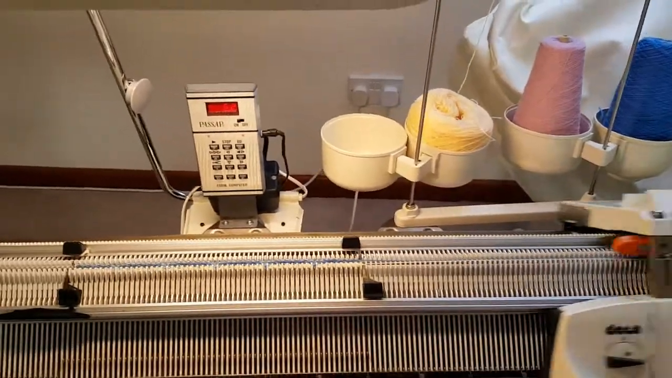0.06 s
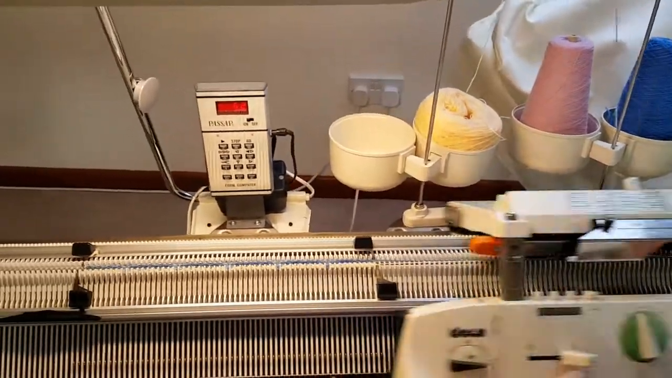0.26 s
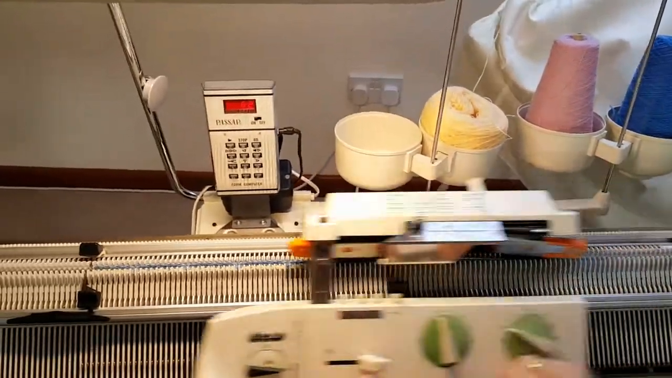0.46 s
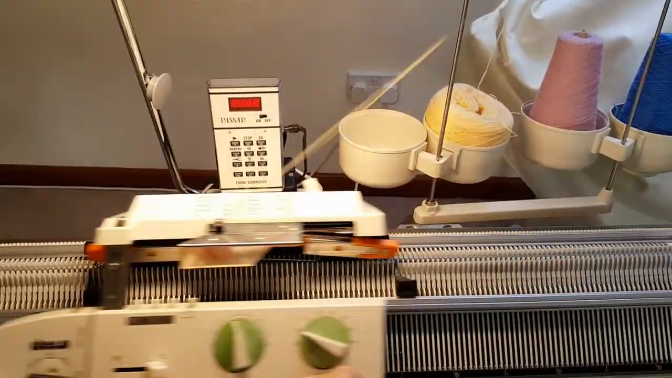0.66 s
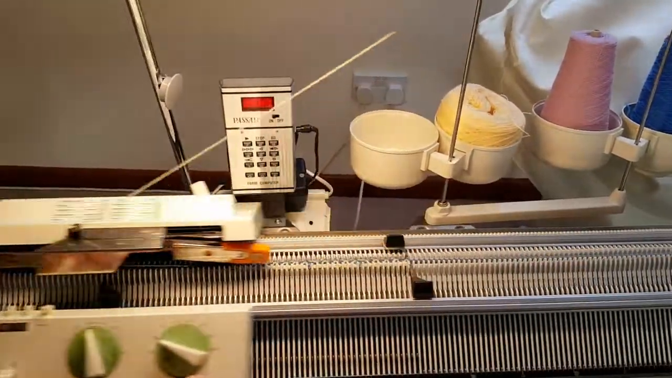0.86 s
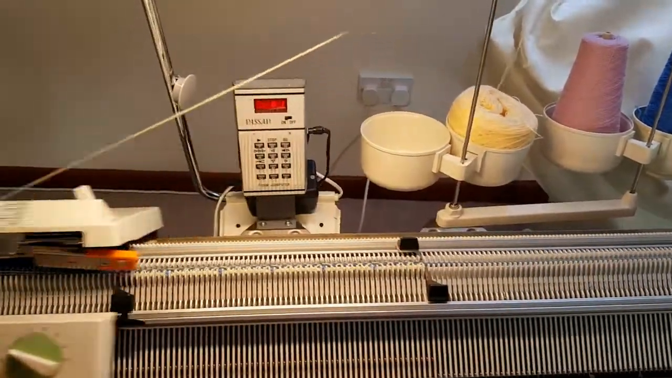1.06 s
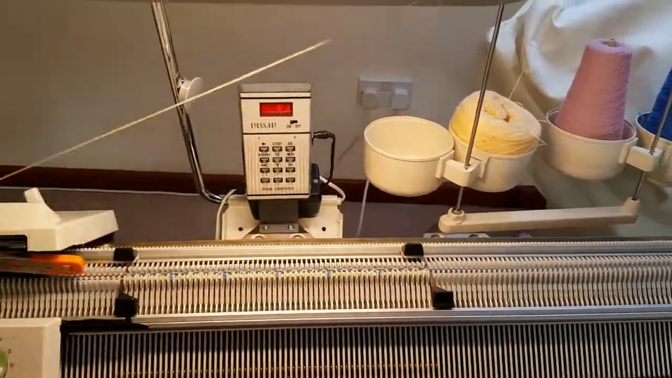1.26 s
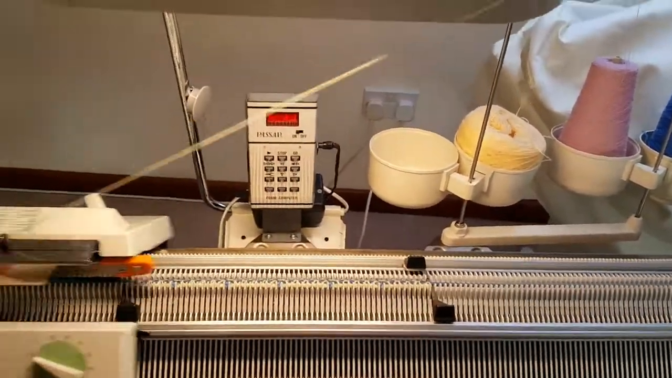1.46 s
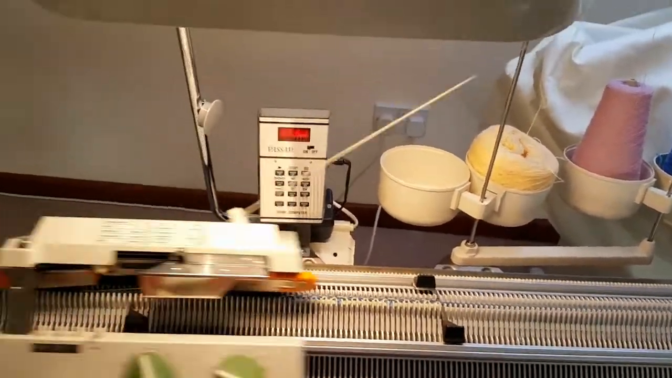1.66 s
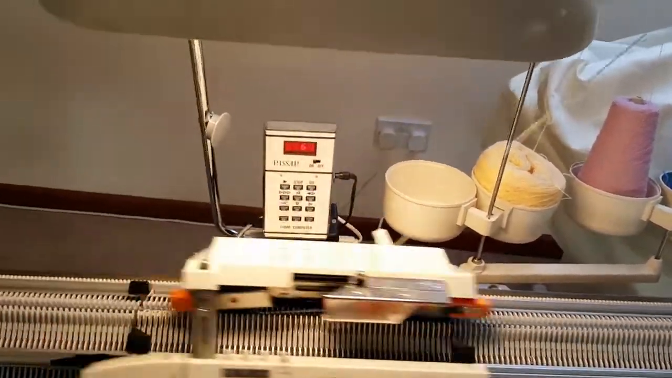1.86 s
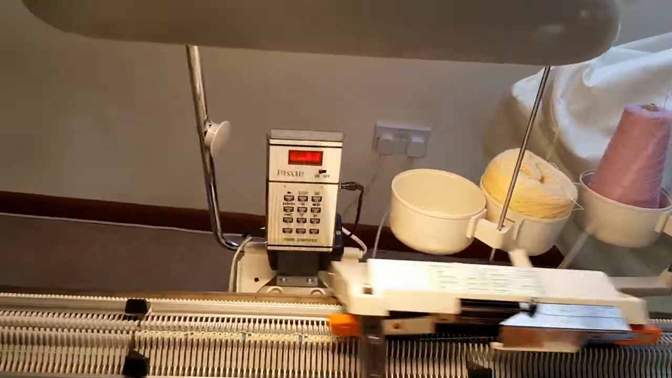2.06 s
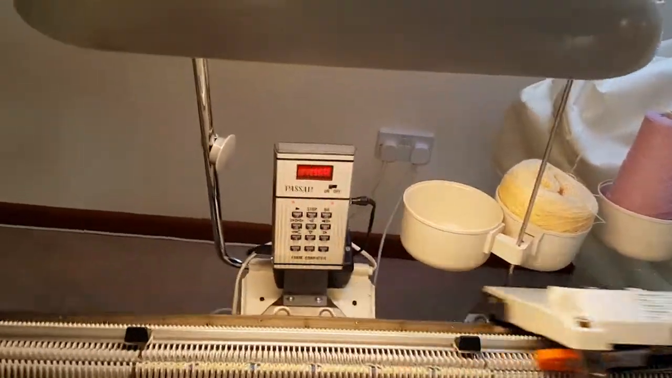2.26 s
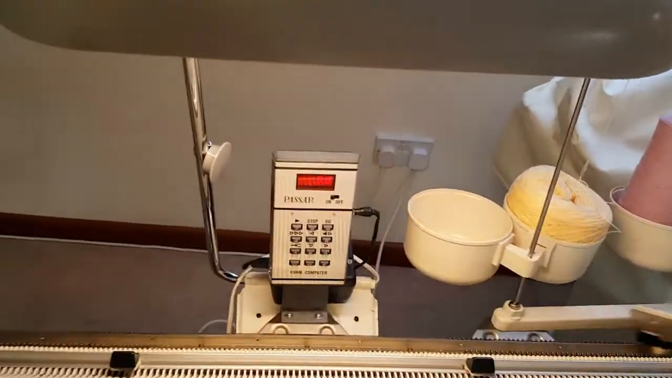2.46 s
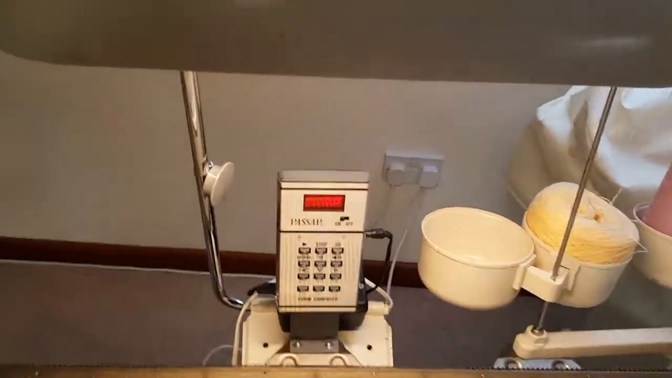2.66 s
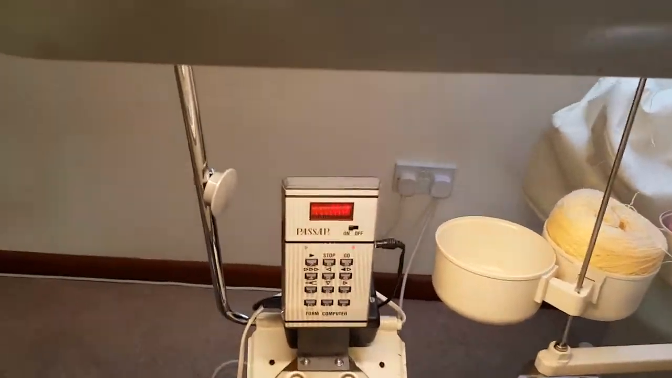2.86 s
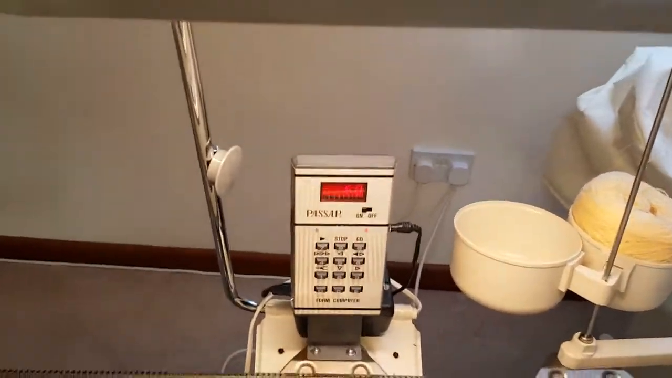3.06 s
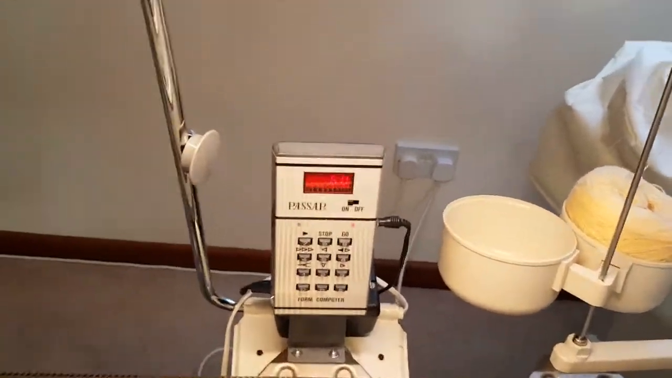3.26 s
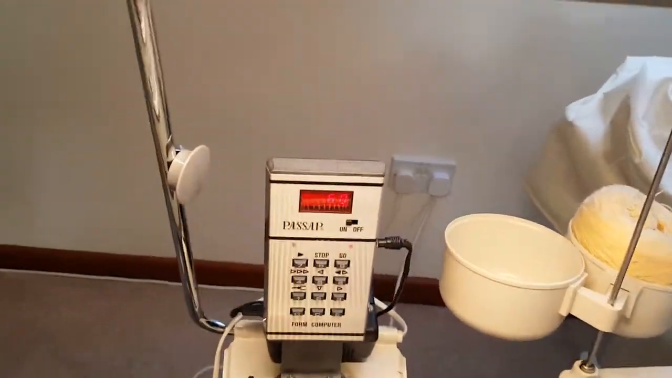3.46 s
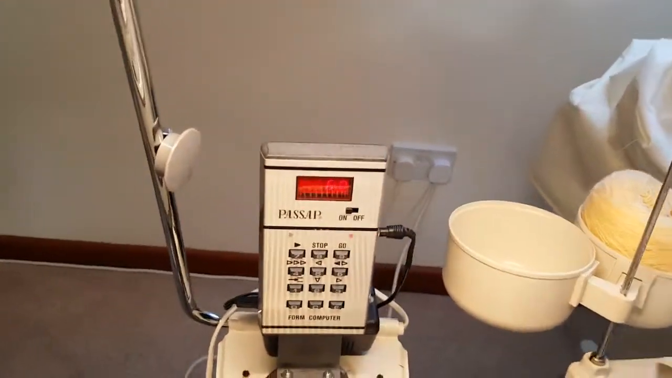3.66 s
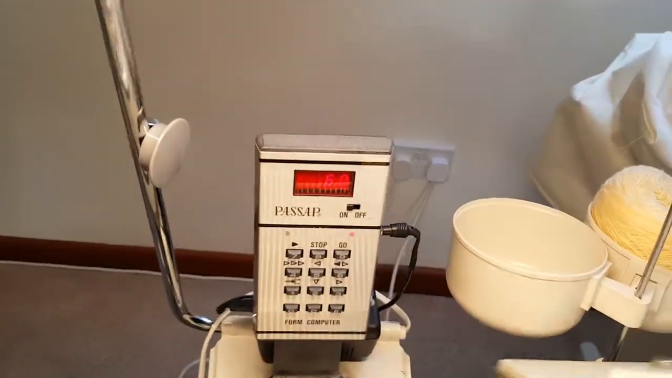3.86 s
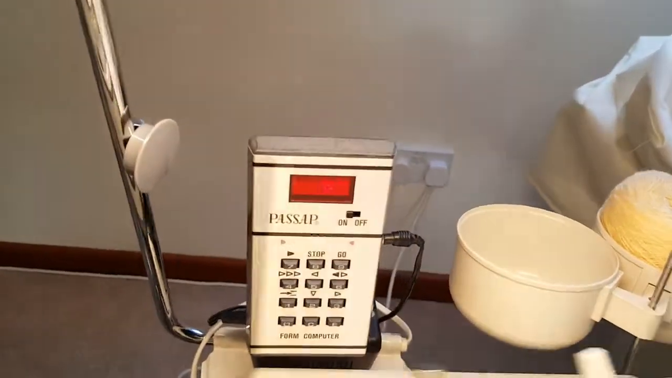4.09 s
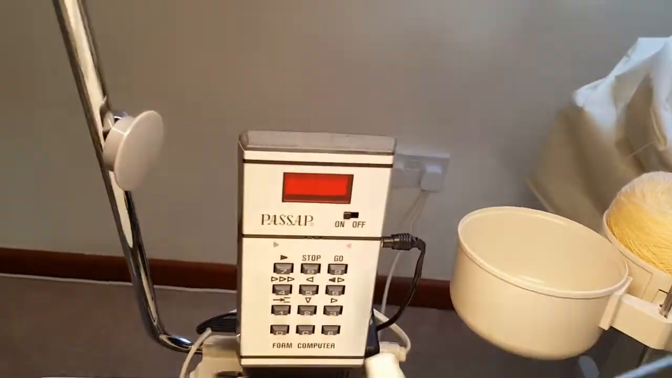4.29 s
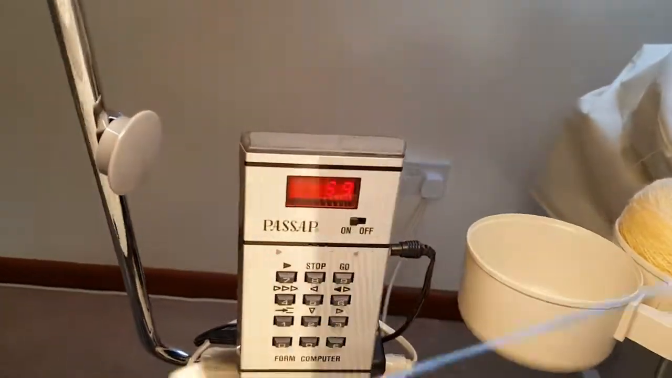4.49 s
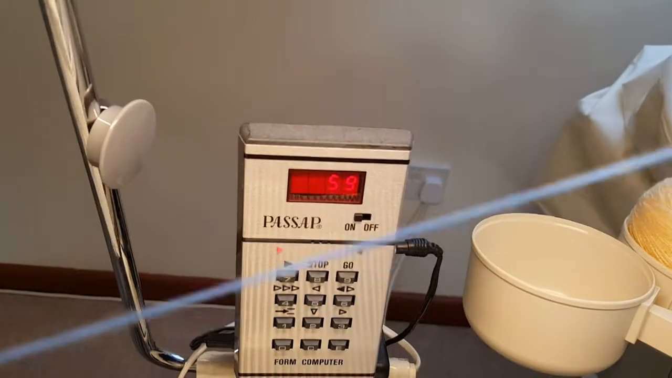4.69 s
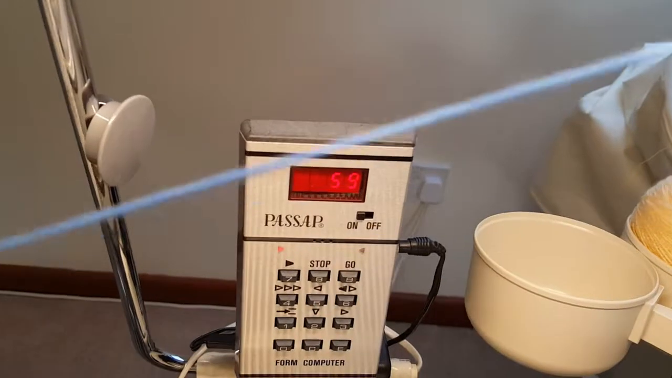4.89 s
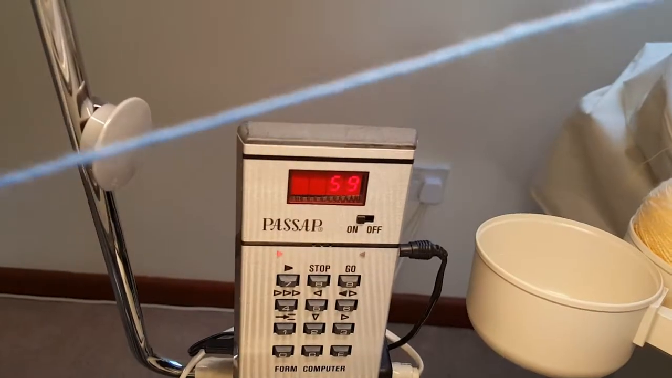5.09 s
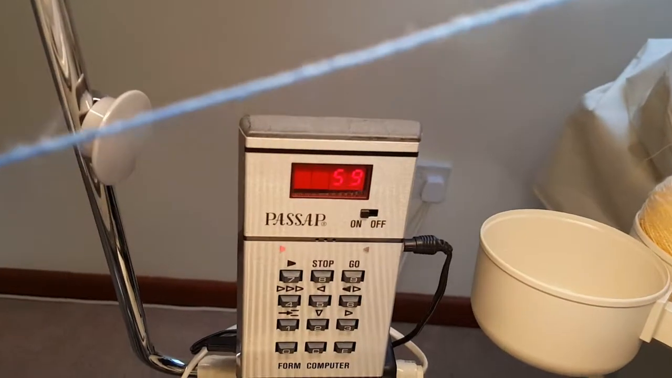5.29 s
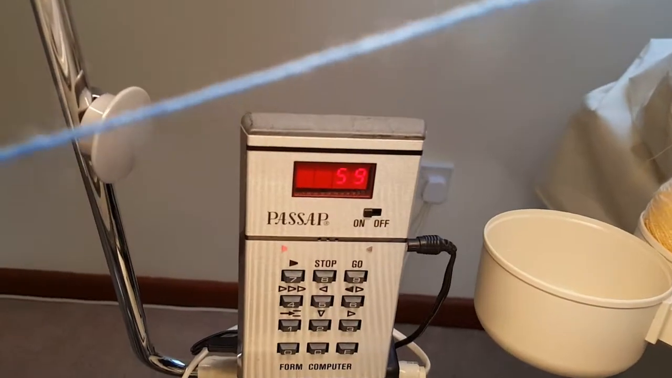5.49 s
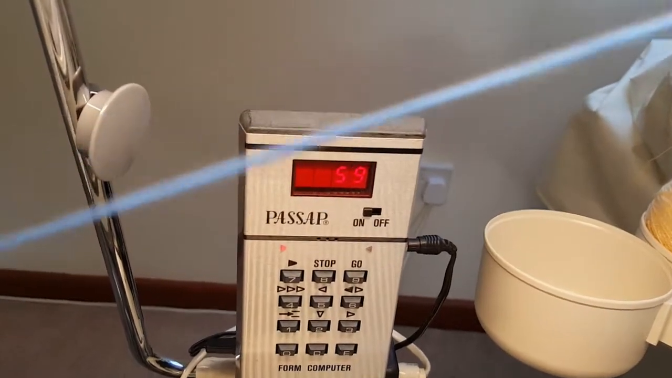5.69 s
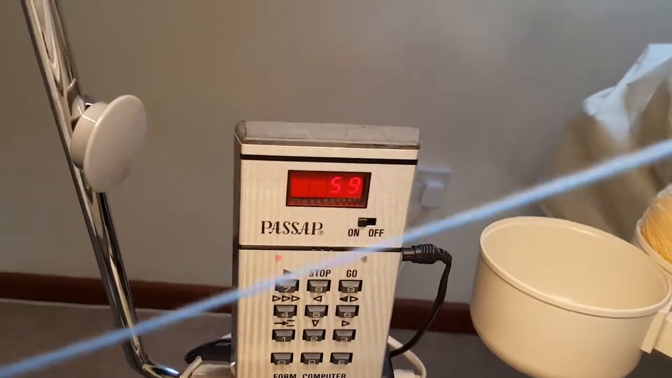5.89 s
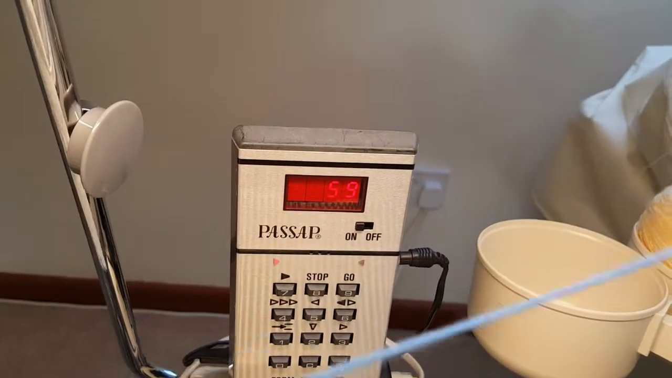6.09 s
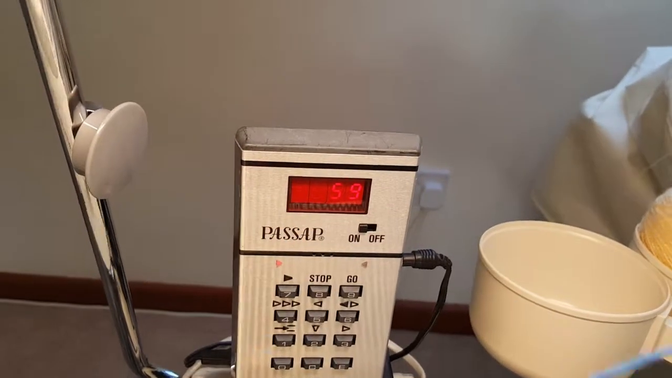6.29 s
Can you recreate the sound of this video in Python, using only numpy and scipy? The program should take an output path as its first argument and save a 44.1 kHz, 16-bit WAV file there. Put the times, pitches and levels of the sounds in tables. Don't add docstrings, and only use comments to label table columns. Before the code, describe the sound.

A few clicks and jerky shoves start the carriage, then a fast metallic rattle runs over the needles and dies away. After a tiny gap a second pass swells and stops with a knock. Bright snaps and plastic clacks fill the turn, a third rattling pass follows, and light ticks remain over faint room air, heard close with slight handling rumble.

```python
import sys
import numpy as np
from scipy import signal
from scipy.fft import rfft, irfft, next_fast_len
from scipy.io import wavfile
from scipy.ndimage import uniform_filter1d

SR = 44100
rng = np.random.default_rng(int(sys.argv[2]) if len(sys.argv) > 2 else 0)


def wrap_up_sound(samples):
    columns = np.atleast_2d(samples).T
    tamed = np.clip(columns, -1, 1)
    steps = np.round(tamed * 32767).astype(np.int16)
    wavfile.write(sys.argv[1], SR, steps)


def ratio_of_db(decibels):
    return 10 ** (np.asarray(decibels, float) / 20)


N = 279594


def evened(x):
    return x / np.sqrt(np.mean(x ** 2) + 1e-20)


def steady(x, span_s=0.12):
    return x / np.sqrt(uniform_filter1d(x ** 2, int(span_s * SR)) + 1e-12)


def read(points, hz):
    f, value = np.transpose(points)
    return np.interp(np.log(hz + 1), np.log(f + 1), value)


def over_time(points):
    return np.interp(np.arange(N) / SR, *np.transpose(points))


def add(mix, s, sound):
    part = mix[round(s * SR):][:len(sound)]
    part += sound[:len(part)]


def body(points, rings=(), tilt_db=0, knee_hz=1500, size=4096):
    hz = np.fft.rfftfreq(size, 1 / SR)
    gain = ratio_of_db(read(points, hz) + tilt_db * np.log2(np.maximum(hz, knee_hz) / 6000))
    gain = gain * (1 + sum(ratio_of_db(db) * 2 / np.hypot(1, 2 * (hz - f) / w) for f, w, db in rings))
    cepstrum = irfft(np.log(gain / gain.max() + 1e-5))
    cepstrum[1:size // 2] *= 2
    cepstrum[size // 2 + 1:] = 0
    taps = irfft(np.exp(rfft(cepstrum)))
    return taps / np.linalg.norm(taps)


def ring(x, taps):
    return signal.oaconvolve(x, taps)[:len(x)]


def hum(x, hz, width_hz):
    r = np.exp(-np.pi * width_hz / SR)
    return signal.lfilter([1], [1, -2 * r * np.cos(2 * np.pi * hz / SR), r * r], x)


def wander(x, patchy_db):
    z = signal.stft(x, SR, nperseg=512, noverlap=384)[2]
    field = rng.standard_normal(z.shape)
    field = uniform_filter1d(uniform_filter1d(field, size=9, axis=0), size=12, axis=1)
    return signal.istft(z * ratio_of_db(patchy_db * evened(field)), SR, nperseg=512, noverlap=384)[1][:N]


# time_s, effort_db
PASSES = [
    [(.4, -41.5), (.446, -20.5), (.72, -19), (.92, -21.5), (.945, -25), (1.2, -28.5), (1.25, -31.5),
     (1.3, -39), (1.445, -55.5)],
    [(1.64, -35.5), (1.72, -28), (1.85, -21.5), (2.05, -18), (2.2, -20), (2.3, -18.5), (2.38, -19),
     (2.43, -32.5)],
    [(3.99, -31.5), (4.03, -25.5), (4.2, -20), (4.33, -18.5), (4.45, -22), (4.6, -27), (4.8, -27.5),
     (4.92, -35.5), (5.0, -44.5)],
]
BITE_DB = [0.5, 5, 0.5]
# pass_share, lead_db
NEEDLE_LEAD = [(0, -3.5), (.15, 2), (0.349, 0), (.65, -3), (1, -3.5)]
# start_s, hold_s, effort_db, lead_db
SHOVES = [(0.0, 0.09, -29, -0.5), (0.119, 0.046, -33, 3.5), (0.165, 0.097, -31, 8),
          (0.256, 0.064, -27, 2.5), (0.356, 0.038, -39, 5.5), (1.458, 0.077, -57.5, 5),
          (1.512, 0.019, -46, 3), (1.548, 0.055, -41.5, 11), (2.45, 0.068, -27, -2), (2.576, 0.043, -35, 2),
          (2.641, 0.039, -36, 4), (2.704, 0.28, -42.5, 6), (2.874, 0.082, -33, -2.5),
          (2.992, 0.019, -38, 5), (3.016, .1, -30, -1), (3.1, .05, -35, -8.5), (3.175, 0.13, -51, -3),
          (3.315, 0.084, -37.5, 3), (3.42, 0.12, -29, 0.5), (3.578, 0.097, -31.5, 11.5),
          (3.678, 0.1, -31, 0), (3.795, 0.16, -38, 6.5), (4.972, 0.12, -47.5, 2), (5.114, .16, -52.5, 3.5),
          (5.302, 0.5, -62.5, 4), (5.56, .09, -56, 0), (5.698, 0.12, -51, -5), (5.791, 0.13, -49.5, 8),
          (5.928, 0.16, -47, -4.5), (6.074, .05, -52.5, 8), (6.15, 0.053, -43, 2), (6.231, 0.21, -34.5, 3)]
RISE_DB_PER_S, FALL_DB_PER_S = 800.5, 318.5


def motion():
    t, parts = np.arange(0, N + 32, 32) / SR, []

    def edge_db(start, end):
        return RISE_DB_PER_S * np.maximum(start - t, 0) + FALL_DB_PER_S * np.maximum(t - end, 0)

    for (s, db), bite_db in zip(map(np.transpose, PASSES), BITE_DB):
        share = np.clip((t - s[0]) / (s[-1] - s[0]), 0, 1)
        lead_db = np.interp(share, *np.transpose(NEEDLE_LEAD)) + bite_db * (1 - share)
        parts.append((np.interp(t, s, db) - edge_db(s[0], s[-1]), lead_db))
    for s, hold, db, lead_db in SHOVES:
        parts.append((db - edge_db(s, s + hold), lead_db))
    power = sum(ratio_of_db(2 * db) for db, _ in parts) + 1e-9
    lead_db = sum(ratio_of_db(2 * db) * lead for db, lead in parts) / power
    return [np.interp(np.arange(N) / SR, t, db) for db in (10 * np.log10(power), lead_db)]


def needle_train(speed, per_s, spread_db, bunch):
    unevenness = 1 + 1.5 * uniform_filter1d(rng.standard_normal(N), size=900)
    turns = np.cumsum(speed * unevenness) / SR
    chance = per_s / SR * (1 + bunch * np.exp(-(turns % 1) / .15))
    size = ratio_of_db(spread_db * np.minimum(rng.exponential(1, N), 4)) * rng.standard_normal(N)
    return size * (rng.random(N) < chance)


# pitch_hz, level_db per Hz
STEEL = [(880, -83.5), (1500, -7), (2290, -7.5), (3000, -7.5), (3810, -6), (4760, -4), (5640, -6),
         (7770, -6), (10600, -10.5), (12600, -9.5), (15500, -10.5), (16000, -43), (16500, -55.5)]
# pitch_hz, width_hz, level_db
STEEL_RINGS = [(2830, 260, -8), (4800, 400, -7), (7660, 1200, -7), (9760, 160, -4), (12150, 1000, -7.5)]


def needle_chatter(ticks, needle_db):
    contact = evened(ticks) + .45 * rng.standard_normal(N)
    chatter = steady(wander(ring(contact, body(STEEL, STEEL_RINGS)), 2.2))
    sizzle = signal.sosfiltfilt(signal.butter(2, 9000, "high", fs=SR, output="sos"), chatter)
    chatter = chatter + (ratio_of_db(np.maximum(0.3 * (needle_db + 38), -7)) - 1) * sizzle
    return ratio_of_db(needle_db) * chatter


# pitch_hz, level_db per Hz
SHELL = [(150, -45), (250, -3.5), (302, -1), (653, 6.5), (722, 9), (852, 8.5), (1020, 5), (1400, 2),
         (2280, 4), (3000, 3), (3500, 1.5), (4550, 3.5), (7700, -120)]
# pitch_hz, width_hz, level_db
SHELL_RINGS = [(661, 21, -3.5), (948, 45, -3.5), (1096, 36, -3.5), (1200, 160, -9.5), (1380, 260, 5),
               (1450, 27, -14)]
BOOM_DB, CLATTER_DB, CLATTER_LEAD = -5, -6, 0.28


def shell_rattle(ticks, heavy, lead_db):
    blows = evened(heavy) + 0.68 * evened(ticks)
    shell = wander(ring(blows, body(SHELL, SHELL_RINGS)), 1.42)
    boom = signal.sosfiltfilt(signal.butter(2, 1050, fs=SR, output="sos"), shell)
    clatter = steady(shell - boom)
    return ratio_of_db(BOOM_DB) * steady(boom) + ratio_of_db(CLATTER_DB + CLATTER_LEAD * lead_db) * clatter


# time_s, level_db against effort
LID = [(0, -8), (.25, -20), (.33, 4.5), (0.449, -16), (0.619, -19), (.85, -18), (1.0, -14), (1.75, -24),
       (2.0, -11.5), (2.4, -12), (2.55, -11), (3.85, -16), (3.95, -6), (4.15, -20), (4.4, -10.5),
       (4.6, -8.5), (5.0, -17), (6.34, -7.5)]


def lid_hum(heavy):
    return ratio_of_db(over_time(LID)) * steady(hum(np.diff(heavy, prepend=0), hz=866, width_hz=24), 0.323)


# pitch_hz, level_db per Hz
BED = [(15, -92), (50, -53.5), (108, -14), (145, -4), (237, -7.5), (293, -1), (600, -8), (780, -33),
       (1320, -120)]
# time_s, level_db
PRESS = [(0, 1.5), (.3, -1), (.5, -12), (.8, -10.5), (1.2, 2), (1.9, -1), (2.4, -4), (2.7, -5.5),
         (3.2, -3.5), (3.5, 0), (4.3, -2), (5.0, -1), (5.2, -3), (6.34, -0.5)]
# start_s, level_db
JOLTS = [(.04, -51.5), (0.166, -40), (.25, -61), (1.593, -39.5), (2.452, -25.5), (3.322, -38), (3.469, -33),
         (3.678, -60), (3.908, -33), (4.388, -36.5), (4.94, -38), (5.22, -55), (6.28, -35)]
RUMBLE_DB, RUMBLE_SLOPE = -38.5, 0.67
JOLT_RISE_S, JOLT_T60_S = 0.0027, 0.1


def bed_rumble(heavy, effort_db):
    rumble = steady(ring(rng.standard_normal(N) + 1.9 * evened(heavy), body(BED, size=8192)), 0.58)
    weight = ratio_of_db(RUMBLE_DB + RUMBLE_SLOPE * (effort_db + 23.0) + over_time(PRESS))
    t = np.arange(SR // 2) / SR
    for s, db in JOLTS:
        add(weight, s, ratio_of_db(db - 60 * t / JOLT_T60_S) * (1 - np.exp(-t / JOLT_RISE_S)) * 2)
    return weight * rumble


NEEDLES_PER_S, FASTER = 150, .14
CHATTER_DB = -5.5


def rattle():
    effort_db, lead_db = motion()
    speed = NEEDLES_PER_S * ratio_of_db(FASTER * (effort_db + 22))
    ticks = needle_train(speed, per_s=2200, spread_db=1.5, bunch=4.5)
    heavy = needle_train(speed, per_s=3000, spread_db=0.9, bunch=2)
    plastic = ratio_of_db(effort_db) * (shell_rattle(ticks, heavy, lead_db) + lid_hum(heavy))
    steel = needle_chatter(ticks, effort_db + lead_db + CHATTER_DB)
    return plastic + steel + bed_rumble(heavy, effort_db)


# time_s, level_db
GRIP = [(0, -52.5), (.3, -53), (.45, -87), (1.5, -74), (2.1, -60), (2.6, -72), (2.95, -57), (3.2, -72),
        (3.45, -49), (3.9, -58), (4.3, -59), (4.6, -71), (5.3, -68.5), (5.6, -64), (6.2, -64.5),
        (6.34, -40)]
GRIP_LOW_HZ, GRIP_TOP_HZ = 28, 112
DRONE_HZ, DRONE_WIDTH_HZ, DRONE_DB = 36, 12, -66


def handling():
    a, b = rng.standard_normal((2, N))
    band = signal.butter(2, [GRIP_LOW_HZ, GRIP_TOP_HZ], "band", fs=SR, output="sos")
    grip = ratio_of_db(over_time(GRIP)) * evened(signal.sosfilt(band, a))
    return grip + ratio_of_db(DRONE_DB) * evened(hum(np.diff(b, prepend=0), DRONE_HZ, DRONE_WIDTH_HZ))


# pitch_hz, level_db per Hz
AIR = [(15, 2), (25, -14), (111, -0.5), (208, 5.5), (232, -21), (330, 5.5), (399, -4.5), (1780, -8.5),
       (2330, -9.5), (12600, -55), (16500, -43)]
AIR_DB = -54


def still_air():
    hiss = ports(*rng.standard_normal((2, N)))
    return ratio_of_db(AIR_DB) * evened(signal.oaconvolve(hiss, body(AIR)[None], axes=1)[:, :N])


TILT_PER_OCTAVE_DB = 4
JINGLE_T60_S, KNOCK_T60_S = 0.075, 0.2
PING_S, PING_SHARE = .0005, .35


def clacks(hits, tilt_db, ring_db, jingle):
    out, knock, t = np.zeros(N), np.zeros(N), np.arange(5000) / SR
    snap = .9 * np.exp(-(t / .0018 - 1) ** 2)
    tail = jingle * ratio_of_db(-60 * t / JINGLE_T60_S)
    knock_shape = (1 - np.exp(-t / 0.0014)) * ratio_of_db(-60 * t / KNOCK_T60_S)
    for s, db, hz, knock_db in hits:
        noise = rng.standard_normal(5000)
        contact = noise * abs(noise) ** 0.45 * (1 - np.exp(-t / 0.0008))
        rings = STEEL_RINGS + [(hz, 0.08 * hz, ring_db)]
        tilt = tilt_db + TILT_PER_OCTAVE_DB * np.log2(hz / 5000)
        part = body(STEEL, rings, tilt, np.clip(.85 * hz, 1500, 2600), size=1024)
        clack = ring(contact * (snap + tail), part)
        ping = np.exp(-(t / PING_S - 3) ** 2) * np.sin(2 * np.pi * hz * t)
        clack = clack / abs(clack).max() + PING_SHARE * np.clip(5000 / hz, .7, 2) * ping
        add(out, s, ratio_of_db(db - 1.5) * clack / abs(clack).max())
        add(knock, s, ratio_of_db(knock_db - 8.5) * contact * knock_shape)
    return out + ring(knock, body(SHELL, SHELL_RINGS))


# start_s, level_db (peak), pitch_hz, knock_db (into the shell)
CAMS = [(0.048, -17, 9900, -15), (0.1123, -10, 8660, -15.5), (0.2442, -2, 5900, -14.5),
        (0.171, -9, 7700, -22), (0.369, -25, 9000, -42), (0.496, -12, 3220, -28), (1.2896, -34, 2720, -37),
        (1.504, -35, 5530, -36), (1.6018, -4.5, 5680, -25), (2.154, -4, 12400, -13.5),
        (2.1545, -16, 2700, -13), (2.4462, -7.5, 3670, -19), (2.4583, -12, 4520, -11.5),
        (3.0195, -9, 5150, -17), (3.039, -10, 3500, -22), (3.054, -5.5, 4370, -17),
        (3.084, -10, 4630, -31.5), (3.3083, -15.5, 4645, -16.5), (3.325, -14, 2140, -12.5),
        (3.4127, -8, 5000, -15.5), (3.6248, -1, 8710, -13.5), (3.69, -6, 6140, -14),
        (3.8577, -40, 2830, -17), (3.903, -12.5, 3330, -14), (3.933, -11.5, 2190, -16),
        (4.3872, -18, 3637, -12.5), (4.4358, -10, 7764, -12.5), (1.7, -16, 8100, -27),
        (4.011, -37, 2996, -19), (4.485, -22, 2948, -16), (4.946, -25, 9080, -37),
        (5.7336, -32, 5957, -39.5), (6.2369, -14.5, 4800, -24)]


def cams():
    return clacks(CAMS, tilt_db=1.3, ring_db=0, jingle=0.22)


def wavering(notes):
    out = np.zeros(N)
    for start, end, hz, width_hz, db in notes:
        t = np.arange(start, end, 1 / SR)
        noise = rng.standard_normal((2, SR // 2 + 4000))
        slip = signal.lfilter([1], [1, -np.exp(-np.pi * width_hz / SR)], noise)[:, :len(t)]
        tone = (slip[0] + 1.8 * slip.std()) * np.cos(2 * np.pi * hz * t)
        tone = tone + slip[1] * np.sin(2 * np.pi * hz * t)
        add(out, start, ratio_of_db(db) * evened(tone) * signal.windows.tukey(len(t), .6))
    return out


# start_s, end_s (silent if before the start), pitch_hz, level_db
HUMS = [(.43, .5, 860, -23), (.59, 0.695, 855, -23.5), (.69, 0.775, 870, -21.5), (.83, .9, 850, -27),
        (4.98, 5.1, 880, -49), (.05, .095, 1200, -30.5), (.5, .82, 205, -44.5), (1.98, 2.03, 770, -26),
        (2.2, 2.11, 860, -20.5), (2.5, 2.28, 850, -27.5), (2.1, 2.41, 810, -21), (3.025, 3.07, 1020, -27),
        (3.06, 3.11, 1000, -28), (3.03, 3.15, 1900, -35), (4.215, 4.27, 880, -22), (4.29, 4.37, 890, -25.5),
        (4.43, 4.5, 880, -24.5), (4.43, 4.47, 1290, -23), (4.39, 4.43, 390, -26.5), (3.92, 3.97, 1430, -26)]


def panel_hums():
    return wavering([(start, end, hz, 30, db) for start, end, hz, db in HUMS])


# start_s, level_db (peak), pitch_hz
LATCHES = [(0.163, -4.5, 9140), (0.2018, -7, 5000), (1.173, -11.5, 6540), (1.229, -24, 7000),
           (1.485, -37, 8000), (1.68, -22, 10000), (1.69, -21, 9990), (1.713, -13, 9000),
           (1.577, -16, 8700), (2.576, -19, 8200), (2.641, -19, 7790), (2.658, -13.5, 12500),
           (2.716, -18, 7600), (2.729, -10, 7400), (2.795, -16.5, 7600), (2.808, -7, 8800),
           (2.819, -9.5, 9200), (2.876, -10, 9330), (2.884, -8.5, 9760), (3.476, -0.5, 9300),
           (3.578, -15, 4850), (3.721, -10, 3980), (3.7698, -15, 12110), (3.799, -13, 13300),
           (4.7447, -13.5, 9200), (4.876, -18.5, 6500), (5.19, -36, 7930), (5.26, -55, 7040),
           (5.305, -38, 8050), (5.43, -52, 8050), (5.6925, -31, 7400), (5.772, -33, 5140),
           (5.836, -26, 8400), (5.8978, -30, 4930), (5.944, -29.5, 7500), (5.959, -31, 6000),
           (6.155, -30, 7000), (6.196, -33, 9000), (6.226, -18.5, 7915)]


def latches():
    return clacks([(s, db, hz, db - 24) for s, db, hz in LATCHES], tilt_db=-1.5, ring_db=2.5, jingle=0.3)


# start_s, level_db (peak), pitch_hz, t60_s
THUDS = [(0.164, -34, 774, 0.039), (1.158, -41, 950, 0.045), (1.229, -15, 607, 0.025),
         (1.593, -22.5, 830, 0.044), (2.476, -5.5, 310.7, 0.016), (2.488, -9.5, 919.5, 0.027),
         (3.477, -23, 716, 0.044), (3.624, -18, 947, 0.047), (3.903, -17, 1007, 0.07),
         (3.857, -18.5, 960, 0.06), (3.935, -18, 893, 0.18), (4.399, -18, 885, 0.051),
         (4.95, -17, 696, 0.06), (5.043, -24.5, 1228, 0.036), (5.248, -41, 1001, .06),
         (2.589, -23.5, 783, .07), (2.604, -27, 860, 0.082), (2.659, -33, 858, .05),
         (2.705, -35, 472, 0.081), (2.76, -33, 453, 0.047), (2.811, -31, 453, .1),
         (2.876, -26.5, 480, 0.05), (2.901, -23, 829, 0.054), (2.903, -27, 477.3, 0.045),
         (3.901, -27, 395, 0.12), (4.59, -15, 923, 0.045), (5.229, -40.5, 221.8, 0.047),
         (5.552, -31, 1740, 0.031), (5.735, -30, 690, 0.029), (5.785, -32, 731, 0.037),
         (5.796, -39, 333.4, 0.053), (5.294, -48, 140.7, 0.045), (1.476, -46, 329.8, 0.077),
         (3.699, -24, 400, 0.047), (3.72, -14.5, 1200, 0.042), (3.671, -11.5, 926, 0.046),
         (3.315, -16, 926, 0.044), (3.428, -13, 977, 0.038), (5.676, -17, 980, 0.015),
         (5.955, -30, 679.5, 0.054), (6.193, -28.5, 685, 0.063), (6.289, -24, 900, 0.071)]


def thuds():
    out, t = np.zeros(N), np.arange(9000) / SR
    for s, db, hz, t60 in THUDS:
        pair = np.sin(2 * np.pi * hz * t) + .5 * np.sin(2 * np.pi * 1.1 * hz * t)
        add(out, s, ratio_of_db(db + 2.5 - 60 * t / t60) * (1 - np.exp(-t / 0.0019)) * pair)
    return out


# start_s, end_s, pitch_hz, width_hz, level_db
SQUEAKS = [(1.38, 1.47, 560, 30, -56), (5.8, 5.93, 2420, 70, -44), (5.36, 5.56, 4180, 110, -68),
           (5.54, 5.76, 4080, 110, -68), (5.2, 5.75, 1800, 70, -62), (5.05, 5.33, 2780, 180, -61),
           (5.12, 5.23, 5800, 250, -67), (5.8, 5.87, 4900, 250, -58), (.24, .33, 1720, 50, -37),
           (.26, .35, 2400, 60, -38), (.43, .55, 1420, 50, -33), (.93, 1.1, 660, 45, -33)]


def yarn_squeaks():
    return wavering(SQUEAKS)


# start_s, level_db (peak), pitch_hz
NEEDLES = [(.4238, -24, 7590), (0.4565, -8, 7400), (1.7133, -18, 2020), (1.7408, -13, 3170),
           (2.297, -5.5, 3050), (2.595, -21, 7840), (2.653, -22, 8000), (2.942, -31, 6000),
           (3.303, -22, 5020), (3.34, -11.5, 4800), (3.599, -11, 4580), (3.766, -17, 1302),
           (4.0226, -16, 2660), (4.0859, -8.5, 9514), (4.378, -16, 2385), (4.407, -15, 4540),
           (4.418, -18, 3150), (4.69, -21, 3966), (5.5417, -29.5, 6500), (6.255, -19, 4850),
           (6.27, -22, 5280), (6.289, -15.5, 2070), (5.905, -28, 7000), (.285, -10.5, 2930),
           (0.309, -11.5, 2370), (2.737, -24, 8400), (2.892, -12.5, 4480), (3.464, -16.5, 1510),
           (3.503, -14, 4460), (3.644, -15, 2500), (3.915, -21.5, 3340), (3.955, -13.5, 1300),
           (5.549, -36, 6950), (5.562, -38, 1736), (1.229, -16.5, 1410), (1.288, -26, 900),
           (1.372, -37, 1200)]


def single_needles():
    return clacks([(s, db, hz, db - 16) for s, db, hz in NEEDLES], tilt_db=-3, ring_db=6, jingle=.15)


# start_s, level_db (peak), pitch_hz
PUSHERS = [(1.155, -7.5, 3660), (1.161, -14, 2970), (1.354, -21, 3980), (1.597, -6, 6940),
           (2.928, -26, 4130), (2.9903, -22.5, 3750), (3.262, -29, 1970), (3.3906, -21, 3820),
           (3.488, -7.5, 4130), (3.7002, -11.5, 1940), (4.3983, -1.5, 2996), (4.587, -11.5, 2618),
           (4.7686, -25, 2620), (4.844, -13.5, 4677), (5.385, -46, 2900), (5.43, -46, 2920),
           (5.483, -45, 3050), (1.0964, -14, 1530), (4.8745, -19, 2134), (4.9513, -24, 2480),
           (5.041, -23, 2990), (5.5414, -25, 2640), (5.5485, -13.5, 2660), (5.7838, -25.5, 2246),
           (5.957, -21, 2420), (6.0072, -25.5, 2390), (6.155, -24, 3395), (6.1963, -23.5, 2182)]


def pushers():
    return clacks([(s, db, hz, db - 14.5) for s, db, hz in PUSHERS], tilt_db=-7.5, ring_db=4.5, jingle=0.14)


def scattered(x, t60, start, turns_per_s=9.0, count=4):
    out, at = np.zeros(N), np.arange(start, SR // 2, 12)
    for k in range(count):
        share = np.sqrt(2 / count) * np.cos(np.pi * (turns_per_s * np.arange(N) / SR + k / count))
        taps = np.zeros(SR // 2 + 12)
        signs = rng.choice([-1., 1.], len(at))
        taps[at + rng.integers(0, 12, len(at))] = signs * ratio_of_db(-60 * at / SR / t60)
        out += ring(x * share, taps / np.linalg.norm(taps))
    return out


# pitch_hz, level_db (side minus mid)
SIDE_DB = [(60, -9), (130, -5.5), (290, -6.5), (640, -12), (1410, -3.5), (3100, -.5), (6820, -3),
           (15000, -6)]
# pitch_hz, level_db (left minus right)
LEAN = [(60, -2.5), (130, -3.5), (290, -3), (640, -1.5), (1410, -2.2), (3100, -4.5), (5500, -5),
        (9000, 1.5), (15000, -1.5)]


def ports(mid, stray):
    size = next_fast_len(N)
    hz = np.fft.rfftfreq(size, 1 / SR)
    side = ratio_of_db(read(SIDE_DB, hz)) * rfft(stray, size)
    pair = rfft(mid, size) + np.outer([1, -1], side)
    return irfft(pair * ratio_of_db(np.outer([.5, -.5], read(LEAN, hz))), size)[:, :N]


# time_s, place (-1 left end to 1 right end)
PLACE = [
    (0.0, 0.5),
    (0.5, 0.13),
    (1.3, -0.2),
    (2.0, 0.13),
    (2.6, 0.5),
    (3.7, 0.69),
    (4.2, -0.12),
    (4.9, -0.32),
    (5.6, -0.93),
    (6.34, -0.25),
]
LAG_SAMPLES, LAG_TOP_HZ = 28, 3000
PAN_DB = -2.5


def travel(pair):
    hz, t, z = signal.stft(pair, SR, nperseg=512)
    place = np.interp(t, *np.transpose(PLACE)) * np.array([.5, -.5])[:, None, None]
    turn = 2 * np.pi * LAG_SAMPLES / SR * (hz * np.exp(-hz / LAG_TOP_HZ))[:, None]
    moved = z * ratio_of_db(PAN_DB * place) * np.exp(-1j * turn * place)
    return signal.istft(moved, SR, nperseg=512)[1][:, :N]


def scene():
    machine = rattle() + cams() + panel_hums() + latches() + thuds()
    machine = machine + yarn_squeaks() + single_needles() + pushers()
    mid = machine + ratio_of_db(-8.5) * scattered(machine, t60=0.14, start=200)
    near = travel(ports(mid, scattered(machine, t60=0.04, start=0)))
    return near + still_air() + ports(handling(), handling())


def top_cut(x):
    return signal.sosfilt(signal.butter(12, 16820, fs=SR, output="sos"), x)


def record(dry):
    lean_bass = signal.sosfilt(signal.butter(2, 30, "high", fs=SR, output="sos"), dry)
    mix = 1.158 * np.tanh(lean_bass / 1.147)
    return top_cut(mix)


dry = scene()
out = record(dry)
wrap_up_sound(out)
```